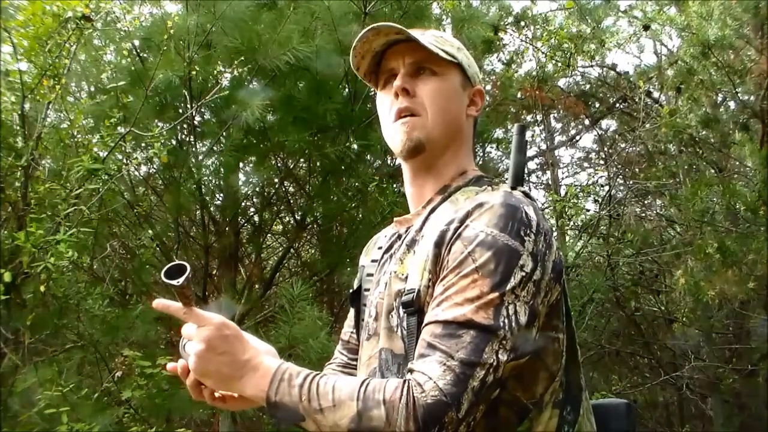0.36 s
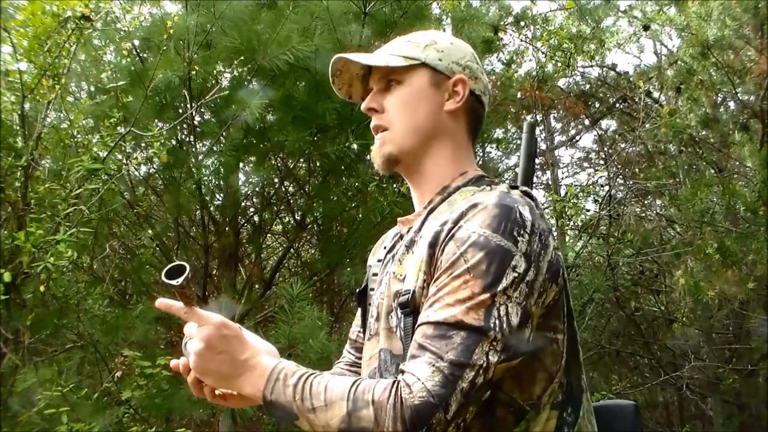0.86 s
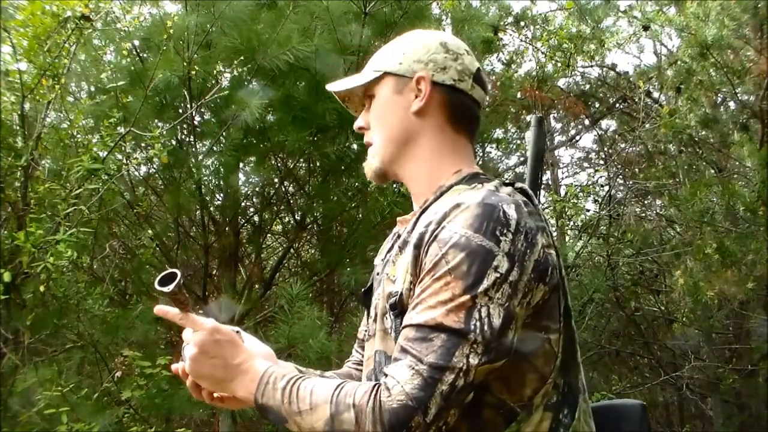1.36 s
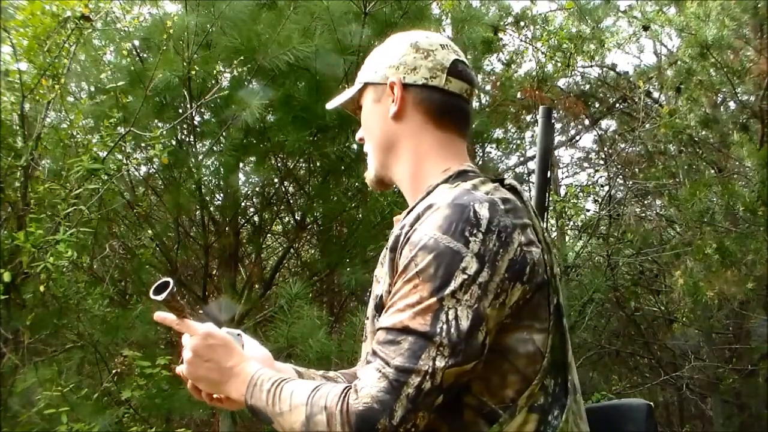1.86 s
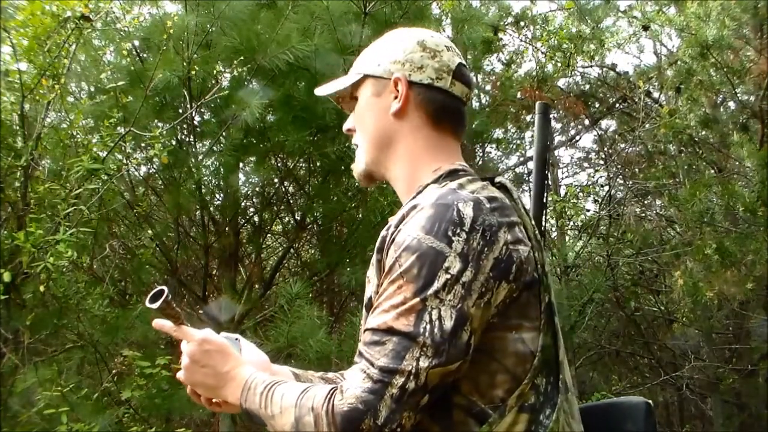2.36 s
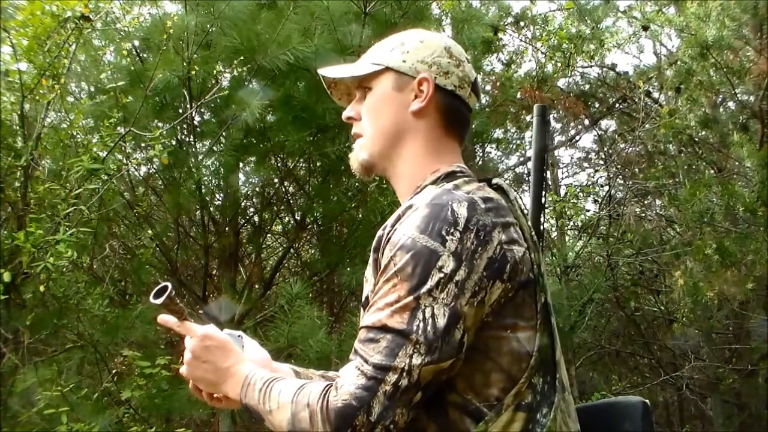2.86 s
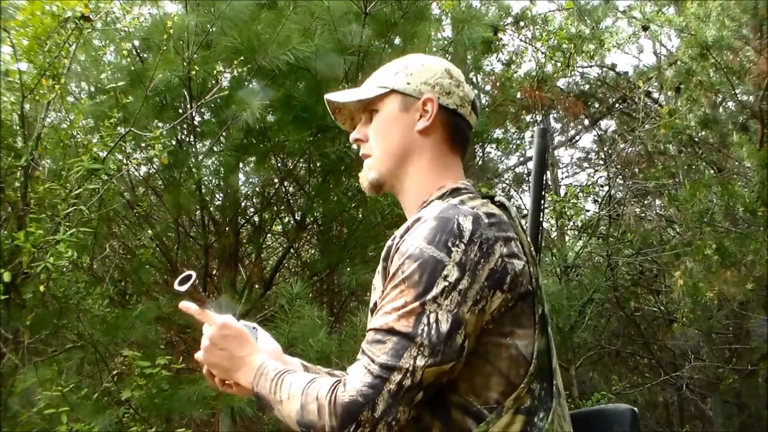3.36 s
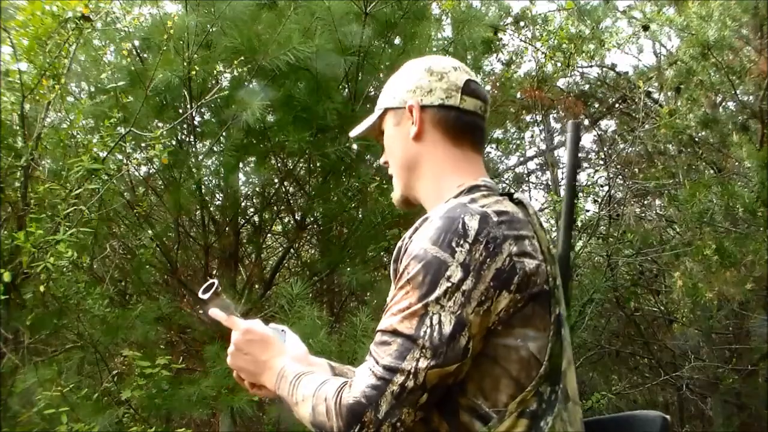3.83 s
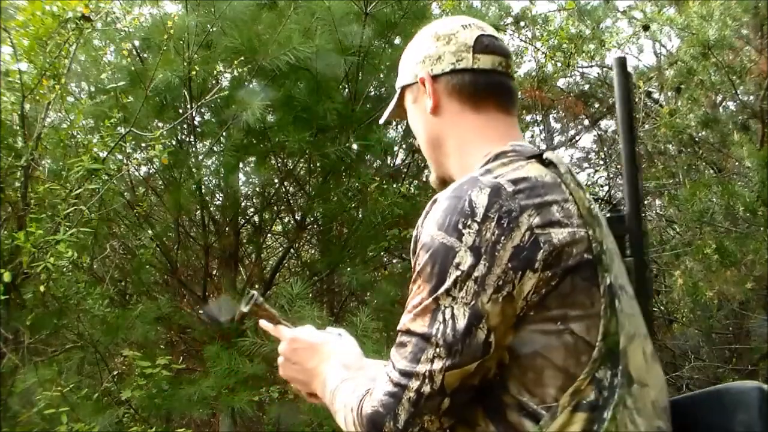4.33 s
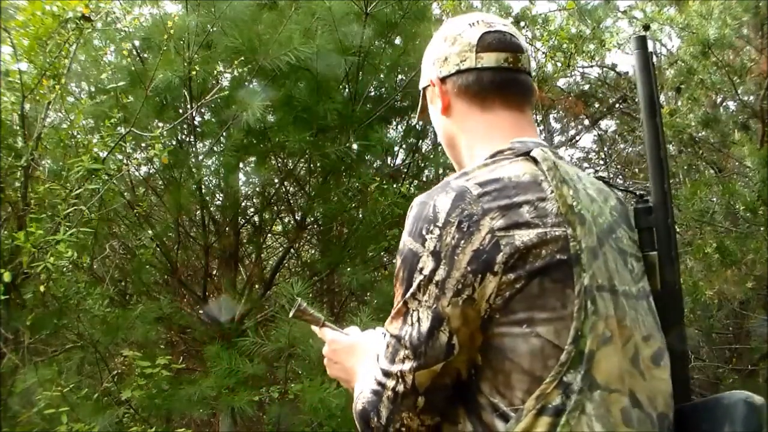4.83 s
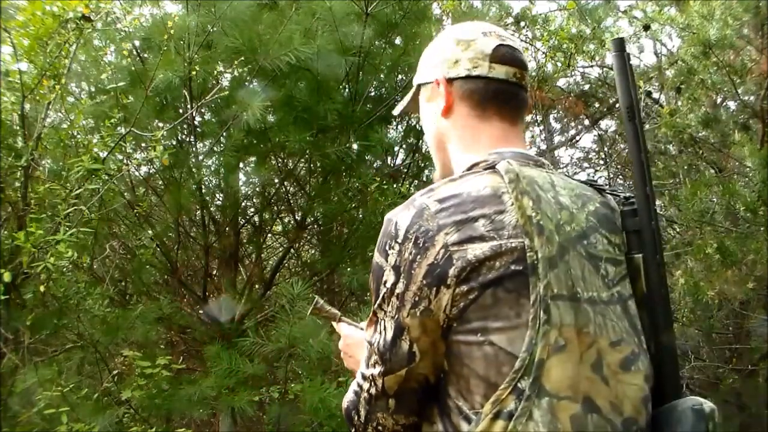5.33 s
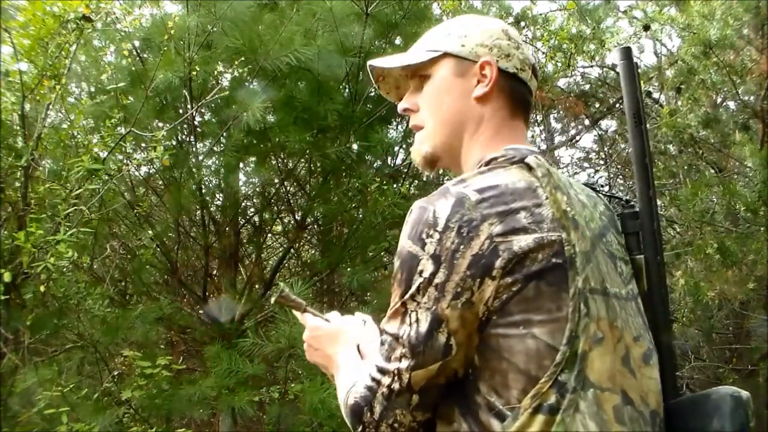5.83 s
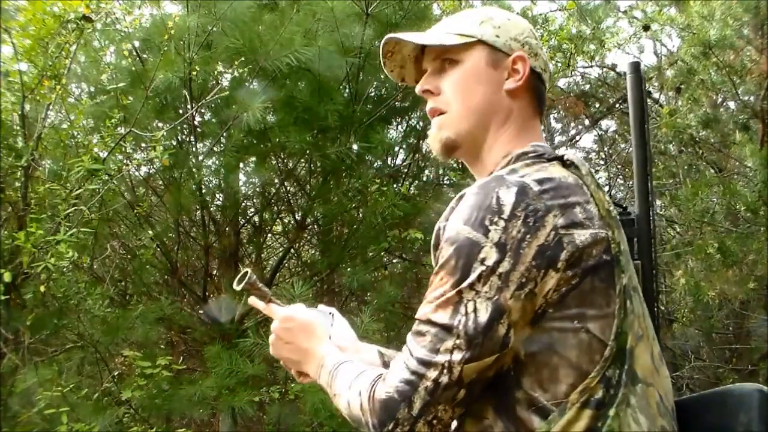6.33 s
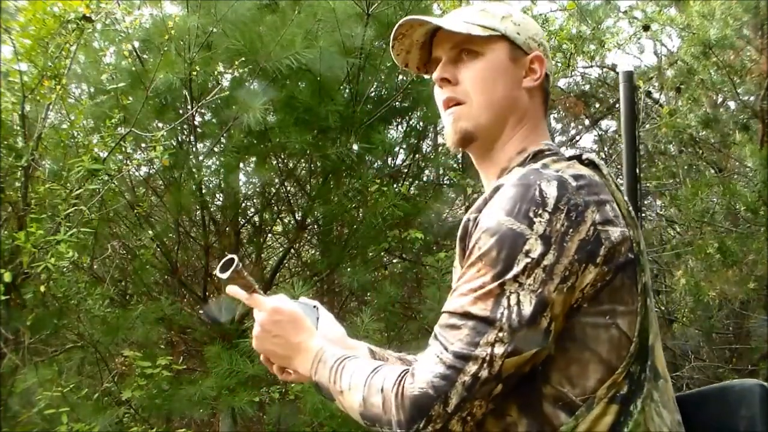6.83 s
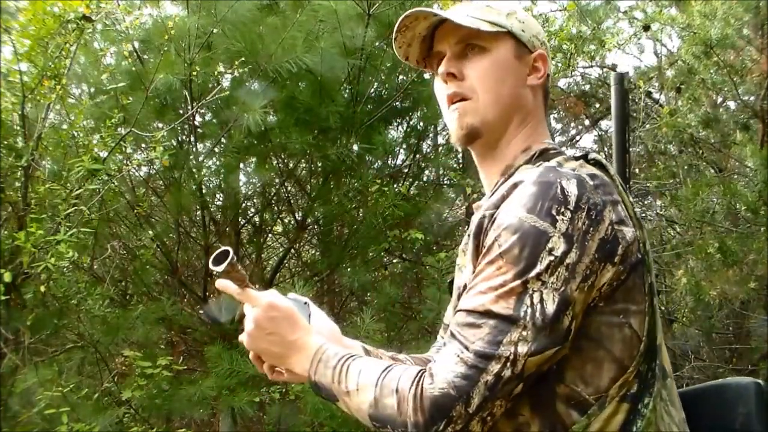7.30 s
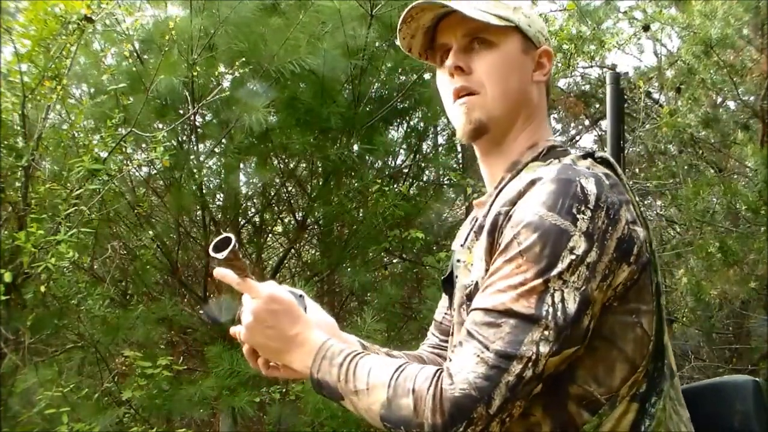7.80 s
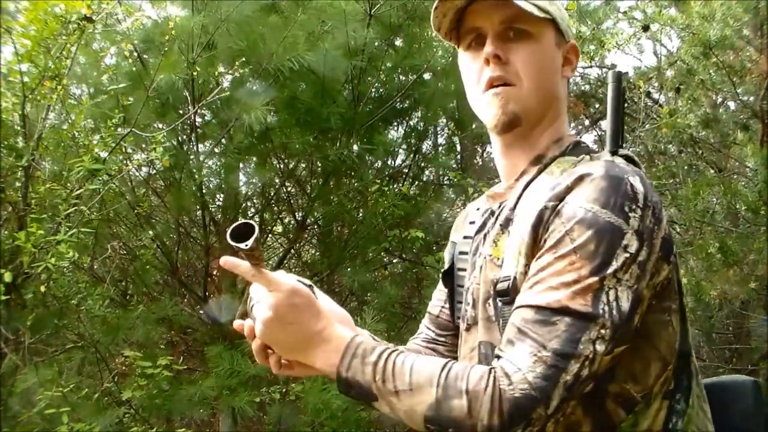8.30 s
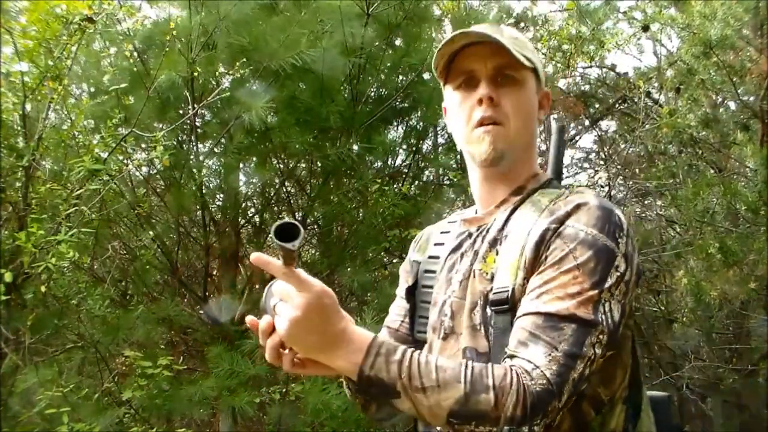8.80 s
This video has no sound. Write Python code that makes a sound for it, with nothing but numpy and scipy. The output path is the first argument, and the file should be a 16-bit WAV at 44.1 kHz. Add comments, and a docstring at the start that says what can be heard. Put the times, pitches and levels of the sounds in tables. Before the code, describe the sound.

A hand-worked turkey call gives sharp woody clucks, then a steady series of nasal, rasping yelps echoing lightly off trees over low traffic rumble.

```python
"""Short clucks open a hand-worked turkey call in woodland; ten longer, increasingly hoarse yelps follow.
A rubbing edge slips about 570-880 times a second and drives a small horn; a scattered echo returns from the trees.
The player's clothes rustle as noise and snap as short bursts; filtered noise makes far traffic and hiss.
A gain control lowers the level after loud sounds and a limiter caps the peaks."""
import sys
import numpy as np
from scipy import signal
from scipy.fft import rfft, irfft, next_fast_len
from scipy.io import wavfile
from scipy.ndimage import uniform_filter1d, minimum_filter1d, map_coordinates

SR = 44100
rng = np.random.default_rng(int(sys.argv[2]) if len(sys.argv) > 2 else 0)


def invert_db(x):
    """Field ratio 10**(x/20) for x, a level in decibels (scalar or array-like)."""
    u = np.asarray(x, float) / 20
    return 10 ** u


def store_pcm(level_fs):
    """Save levels as 16-bit WAV."""
    pcm = np.round(np.clip(level_fs, -1, 1) * 32767).astype(np.int16)
    wavfile.write(sys.argv[1], SR, np.atleast_2d(pcm).T)


N = 404397
T = np.arange(N) / SR

# short pulls: start_s, length_s, slowest_slip_hz, level_db, end_level_db, tilt_db_per_octave
CLUCK_PULLS = [(-.008, 0.018, 730, -19.5, -23.5, -3.5), (.091, 0.014, 657, -21, -18, -5),
               (.249, 0.019, 665, -18, -23, -4), (0.986, .016, 812, -20, -19.5, -7),
               (1.187, 0.018, 653, -21, -18, -2.5), (1.381, .018, 670, -20.5, -17.5, 0),
               (2.016, 0.014, 670, -20.5, -19.5, 1), (2.272, 0.015, 705, -22, -19, 2),
               (2.335, .012, 707, -21, -22, 2.5), (2.809, 0.021, 636, -16, -26, 0.5),
               (2.919, .023, 670, -18.5, -27, 1), (3.483, 0.02, 616, -16, -22, 2),
               (3.913, .016, 654, -15, -24.5, 2.5), (4.428, 0.018, 630, -21, -25.5, -2),
               (4.465, 0.016, 720, -23.5, -24.5, -3), (4.649, 0.035, 670, -19.5, -29.5, -3.5)]
# long pulls: start_s, lead_in_s, length_s, slowest_at_share, slowest_slip_hz, end_slip_hz,
# early_db, midway_db, end_db, midway_tilt_db_per_octave, hoarseness, third_harmonic_db
YELP_PULLS = [(5.113, 0.048, 0.056, 0.44, 622, 692, -33, -26, -31, -1, .3, -3.5),
              (5.505, 0.037, 0.082, 0.46, 590.6, 683, -23.5, -20.5, -27.5, -0.5, .1, -5),
              (5.887, .018, 0.091, 0.59, 586, 640.5, -23.5, -24, -20, 1.5, .3, -5.5),
              (6.287, 0.015, 0.093, 0.17, 589.3, 668, -19.5, -19.5, -26.5, 1, 0.093, 1),
              (6.668, 0.02, .1, 0.37, 566, 630, -28.5, -18, -34, 1, 0.34, 2),
              (7.058, .018, .096, 0.44, 570.5, 638, -19.5, -18, -27, 1.5, 0.66, 0.5),
              (7.452, .017, .088, 0.27, 588.7, 629, -25, -21, -24, -1, 0.68, 0.5),
              (7.832, 0.031, 0.1, 0.48, 621, 630, -18, -16, -23.5, -1.5, 0.91, 0.5),
              (8.206, 0.038, 0.077, 0.092, 617.3, 670, -18, -18, -23.5, -0.5, 0.66, 3),
              (8.578, .016, 0.033, 0.72, 646.6, 680, -16.5, -21, -15, -4, 0.81, 3)]
# light whistling touches: peak_s, rise_s, slip_hz, level_db
PIP_TOUCHES = [(.822, 0.02, 876, -22.5), (0.888, 0.0055, 874, -31.5), (0.913, 0.011, 860, -30),
               (.975, 0.01, 838, -33.5)]
# horn resonances: center_hz, width_hz, gain_db
HORN_MODES = [(835, 260, -21), (1251, 185, 7), (1719, 173.7, 6), (2311, 65, -5.5), (2697, 160, -9.5),
              (3384, 177, -16), (4070, 380, -24.5), (6040, 910, -34.5)]
# decay of the echo from the trunks: frequency_hz, t60_s
TREE_DECAY = [(600, 1), (1500, 0.61), (2500, 0.39), (6000, 0.053)]
# share of the call sent back as the horn points about: time_s, echo_db
ECHO_SHARE = [(0, -29), (2, -26.5), (4, -26), (5, -22.5), (6, -21.5), (6.5, -29.5), (7.5, -31),
              (7.9, -23.5), (8.25, -28.5), (8.6, -26)]
# cloth sliding on cloth: turn_s, level_db, rise_db_per_s, fall_db_per_s (negative: keeps rising)
CLOTH_SWISHES = [(3.62, -49, 149, 34), (3.895, -45, 134, 300), (4.145, -54, 200, 72), (4.3, -77.5, 40, 41),
                 (4.62, -46.5, 40, 100), (4.915, -51, 79, 156), (5.118, -56, 216, 46), (8.42, -60, 16, -11),
                 (8.605, -40.5, 191, 400), (8.86, -62, 15, 63)]
# cloth noise spectrum: frequency_hz, relative_db
CLOTH_SPECTRUM = [(1200, -22), (2000, -4), (3200, -3), (4100, 0), (6400, -5), (10000, -2), (14500, -7)]
# single snapping creases: start_s, peak_db, center_hz
CREASE_SNAPS = [(1.7403, -40, 4270), (4.0522, -28, 3850), (4.117, -27, 3900), (4.154, -25.5, 3620),
                (4.161, -28, 4560), (4.2407, -29.5, 4670), (4.2697, -32, 10200), (4.4046, -32, 4070),
                (4.5037, -24, 8000), (4.9097, -31, 9510), (5.094, -40, 7100), (5.1183, -30.5, 9500),
                (8.033, -38, 11200), (8.0867, -39.5, 8020), (8.6043, -18.5, 12000), (8.6213, -19.5, 8500),
                (8.6334, -28, 4190), (8.8804, -29, 7300), (8.9486, -38, 10500), (9.0368, -44, 10200),
                (9.0765, -33, 7270)]
# flurries of small creases: from_s, to_s, snaps_per_s, softest_peak_db
CREASE_FLURRIES = [(3.947, 4.453, 170, -45.5), (4.804, 5.001, 45, -47), (8.652, 9.163, 150, -61)]
# traffic level, partly gain dips after calls: time_s, relative_db
TRAFFIC_LEVEL = [(0, -54), (1.2, -59), (1.81, -53), (2.4, -58), (2.68, -52), (3.17, -57), (3.75, -49),
                 (4.14, -56), (5.41, -51.5), (6.15, -53.5), (6.65, -62), (6.95, -51.5), (7.35, -61.5),
                 (7.99, -49.5), (8.33, -54), (9.17, -49)]
# traffic spectrum: frequency_hz, relative_db_per_hz
TRAFFIC_SPECTRUM = [(14, -34), (22, 0.5), (30, 3.5), (42, -9.5), (90, 2), (124, -6), (166, -6.5),
                    (305, -12.5), (520, -11.5), (988, -17), (1410, -20), (1780, -25), (3000, -39),
                    (6600, -120)]
# hiss spectrum: frequency_hz, relative_db
HISS_SPECTRUM = [(1500, -20), (2500, -1), (4000, 0), (8000, -3), (14500, -5.5)]

# any pull: level and tilt at its outer ends
QUIET_DB, THIN_DB_PER_OCTAVE = -55, -11
SNAP_OFF_S = 0.0028
SHIMMER_KNOTS_PER_S = 100
TREBLE_DB_PER_OCTAVE = 4.5  # added above the seventh harmonic
CLUCK_RASP_DB = -21.5  # pips too

# cluck: grips, drops to its slowest, speeds up as the pull lets go
GRIP_S, DROP_S, LET_GO_S, HOLD_SHARE = .005, 0.0045, .01, .4
FREE_HZ, DROP_SHARE, CLIMB_SHARE = 850, 0.379, 0.426
OPENS_DB, DIP_DB, SNAP_OFF_DB = -2, -2.5, -16.5
LONG_S = .0205  # longer clucks start at their slowest

PIP_CLIMB_HZ_PER_S, PIP_FALL_S, PIP_TILT_DB_PER_OCTAVE = 900, 0.01, -18

# yelp: whines high and thin, breaks down, sags, climbs again
WHINE_HZ, BREAK_HZ = 783.6, 654
BREAK_S, SETTLE_S, STOP_S = 0.00717, .008, 0.014
WHINE_DB, BREAK_DB, YELP_OFF_DB = -37.5, -1.5, -7.5
SAG_BEND, CLIMB_BEND = 2.22, 1.8
DULL_ENDS_DB_PER_OCTAVE = 2.5  # brightest midway
DOUBLING, CLEAR_DB, HOARSE_DB = 0.2, -28.5, 26


def unit(x):
    """Scale to rms 1."""
    return x / np.sqrt(np.mean(x ** 2) + 1e-20)


def along(points, hz):
    """Interpolate (frequency_hz, value) points on a log axis."""
    f, v = np.transpose(points)
    return np.interp(np.log(hz + 1), np.log(f + 1), v)


def wobble(knots_per_s, size=N):
    """Smooth random curve."""
    knots = rng.standard_normal(int(size * knots_per_s / SR) + 4)
    return map_coordinates(knots, [np.arange(size) * knots_per_s / SR])


def filtered(x, response):
    """Multiply the spectrum of x by a response of frequency."""
    m = next_fast_len(N + 8192)
    return irfft(rfft(x, m) * response(np.fft.rfftfreq(m, 1 / SR)), m)[..., :N]


def stereo_noise(spectrum, side_db, patchy_db):
    """Shaped stereo noise of rms 1 with random gain patches over time and frequency."""
    z = signal.stft(rng.standard_normal((2, N + 512)), nperseg=512)[2]
    field = uniform_filter1d(rng.standard_normal(z.shape[1:]), size=6, axis=0)
    field = uniform_filter1d(field, size=12, axis=1)
    pair = signal.istft(z * invert_db(patchy_db * unit(field)), nperseg=512)[1][:, :N]
    f, db = np.transpose(spectrum)

    def shape(hz):
        return invert_db(np.interp(np.log(hz + 1), np.log(f + 1), db, left=-120, right=-120))

    mid, side = filtered(pair, shape)
    return unit(np.array([mid + invert_db(side_db) * side, mid - invert_db(side_db) * side]))


def call():
    """Slip trains of all clucks, pips and yelps ring through the horn."""
    short_pulls = [cluck(*row) for row in CLUCK_PULLS] + [pip(*row) for row in PIP_TOUCHES]
    strokes = [stroke(p, jitter=0.012, shimmer_db=1.16, sizzle_db=11.0) for p in short_pulls]
    for *row, third_db in YELP_PULLS:
        strokes.append(stroke(yelp(*row), jitter=0.006, shimmer_db=1.5, sizzle_db=6.5, third_db=third_db))
    edge = np.zeros(N)
    for at, slips in strokes:
        edge[at:at + len(slips)] += slips
    return filtered(edge, horn)


def cluck(start_s, length_s, low_hz, db, end_db, tilt):
    """Cluck control points: time_s, slip_hz, level_db, tilt_db_per_octave, doubling, rasp_db."""
    rise_hz = FREE_HZ - low_hz
    first_hz = low_hz + DROP_SHARE * rise_hz * (length_s < LONG_S)
    climb_s = DROP_S + HOLD_SHARE * max(length_s - LONG_S, 0) + 1 / SR
    points = [(-GRIP_S, first_hz, QUIET_DB, THIN_DB_PER_OCTAVE),
              (0, first_hz, db + OPENS_DB, tilt),
              (DROP_S, low_hz, db, tilt),
              (climb_s, low_hz, db, tilt),
              ((climb_s + length_s) / 2, low_hz + CLIMB_SHARE * rise_hz, (db + end_db) / 2 + DIP_DB, tilt),
              (length_s, FREE_HZ, end_db, tilt),
              (length_s + SNAP_OFF_S, FREE_HZ + 15, end_db + SNAP_OFF_DB, THIN_DB_PER_OCTAVE),
              (length_s + LET_GO_S, FREE_HZ + 15, QUIET_DB, THIN_DB_PER_OCTAVE)]
    return [(start_s + t, *rest, 0, CLUCK_RASP_DB) for t, *rest in points]


def pip(peak_s, rise_s, hz, db):
    """Control points of a light touch: a soft, slightly climbing whistle; columns as in cluck()."""
    shape = [(-rise_s, QUIET_DB), (-rise_s / 2, db - 6.5), (0, db),
             (PIP_FALL_S / 2, db - 9), (PIP_FALL_S, QUIET_DB)]
    return [(peak_s + t, hz + PIP_CLIMB_HZ_PER_S * t, level, PIP_TILT_DB_PER_OCTAVE, 0, CLUCK_RASP_DB)
            for t, level in shape]


def yelp(start_s, lead_s, length_s, slowest, low_hz, end_hz, early_db, mid_db, end_db, tilt, hoarse):
    """Yelp control points: rate sags and climbs, hoarseness grows along the pull; columns as in cluck()."""
    done = np.arange(13) / 12
    sag_hz = max(BREAK_HZ - low_hz, 0) * np.maximum(1 - done / slowest, 0) ** SAG_BEND
    climb_hz = (end_hz - low_hz) * (np.maximum(done - slowest, 0) / (1 - slowest)) ** CLIMB_BEND
    # level arches through early, midway and end values
    arch_db = early_db + (end_db - early_db) * done
    arch_db += (mid_db - (early_db + end_db) / 2) * np.sin(np.pi * done)
    arch_db += BREAK_DB * np.maximum(1 - done * length_s / SETTLE_S, 0)
    tilts = tilt - DULL_ENDS_DB_PER_OCTAVE * (2 * done - 1) ** 2
    points = [(-lead_s, WHINE_HZ, QUIET_DB, THIN_DB_PER_OCTAVE),
              (-BREAK_S, WHINE_HZ - 35, WHINE_DB, THIN_DB_PER_OCTAVE)]
    points += list(zip(done * length_s, low_hz + sag_hz + climb_hz, arch_db, tilts))
    points += [(length_s + SNAP_OFF_S, end_hz, end_db + YELP_OFF_DB, tilt - DULL_ENDS_DB_PER_OCTAVE),
               (length_s + STOP_S, end_hz, QUIET_DB, THIN_DB_PER_OCTAVE)]

    def wear(t):
        return hoarse * (0.24 + np.clip(t / length_s, 0, 1))

    return [(start_s + t, *rest, DOUBLING * wear(t), CLEAR_DB + HOARSE_DB * wear(t)) for t, *rest in points]


def stroke(points, jitter, shimmer_db, sizzle_db, third_db=0):
    """One pull: a slip train with fluttering harmonics plus scraping noise, levelled for the horn's output."""
    s, *controls = np.transpose(points)
    first = max(round(s[0] * SR), 0)
    t = np.arange(first, round(s[-1] * SR)) / SR
    slip_hz, db, tilt, doubling, rasp_db = [np.interp(t, s, c) for c in controls]
    turns = np.cumsum(slip_hz * (1 + jitter * wobble(393.3, size=len(t)))) / SR + rng.random()
    k = np.arange(1, 41)[:, None] / 2  # multiples of the slip rate, half steps included
    weight = invert_db(tilt * np.log2(np.maximum(k, 2) / 2))
    weight *= invert_db(TREBLE_DB_PER_OCTAVE * np.log2(np.maximum(k, 7) / 7))
    weight[::2] *= doubling  # half-step multiples
    weight[k[:, 0] == 3] *= invert_db(third_db)
    horn_rms = np.sqrt((abs(weight * horn(k * slip_hz)) ** 2).sum(0) / 2)
    # high harmonics flutter more
    flutter = np.array([wobble(SHIMMER_KNOTS_PER_S, size=len(t)) for _ in k])
    weight *= invert_db(shimmer_db * np.sqrt(np.maximum(k - 1.6, .1)) * flutter)
    tone = (weight * np.cos(2 * np.pi * k * turns)).sum(0) / horn_rms
    # grit pulses once a slip
    grit = (1 + np.cos(2 * np.pi * turns)) * rng.standard_normal((2, len(t)))
    rasp = invert_db(rasp_db + tilt) * grit[0]
    sizzle = invert_db(sizzle_db + tilt) * np.diff(grit[1], prepend=0)
    fade = np.clip(np.minimum(t - s[0], s[-1] - t) / 0.00067, 0, 1)
    return first, invert_db(db) * fade * (tone + rasp + sizzle)


def horn(hz):
    """Horn response: resonances in alternating sign; only a weak mode radiates fully in the bass."""
    modes = []
    for k, (center_hz, width_hz, db) in enumerate(HORN_MODES):
        damping = 1j * hz * width_hz
        modes.append((-1) ** k * invert_db(db) * damping / (center_hz ** 2 - hz * hz + damping))
    low, *high = modes
    # the top mode's flipped sign hollows out the range below it
    upper = sum(high[:-1]) - high[-1]
    return low + upper / (1 + (1080 / (hz + 1)) ** 9) / (1 + (hz / 13000) ** 3)


def trees(x):
    """Scattered echo: decaying noise tails, drawn anew each third of a second."""
    out, step, delay = np.zeros((2, N + 2 * SR)), SR // 3, 300  # samples
    for at in range(0, N, step):
        hz, t, z = signal.stft(rng.standard_normal((2, SR)), SR, nperseg=256)
        decay = invert_db(-60 * t / along(TREE_DECAY, hz)[:, None])
        mid, side = signal.istft(z * decay, SR, nperseg=256)[1]
        tail = np.array([mid + 0.3 * side, mid - 0.28 * side]) / np.linalg.norm(mid)
        wet = signal.fftconvolve(x[None, at:at + step], tail, axes=1)
        out[:, at + delay:at + delay + wet.shape[1]] += wet
    return out[:, :N]


def clothes():
    """Sliding cloth is fine-grained noise; creases snap as noise bursts, singly and in flurries."""
    power = 0
    for s, db, rise, fall in CLOTH_SWISHES:
        power = power + invert_db(db - np.maximum(rise * (s - T), fall * (T - s))) ** 2
    grain = invert_db(2.36 * wobble(250)) * stereo_noise(CLOTH_SPECTRUM, side_db=-6.5, patchy_db=.6)
    cloth = np.sqrt(power) * unit(grain)
    snaps = list(CREASE_SNAPS)
    for from_s, to_s, per_s, db in CREASE_FLURRIES:
        draws = rng.random((int((to_s - from_s) * per_s), 3))
        snaps += [(from_s + u * (to_s - from_s), db + 11 * v ** 2, 3200 * 5.8 ** w) for u, v, w in draws]
    t = np.arange(300) / SR
    for s, db, hz in snaps:
        burst = rng.standard_normal((2, 300)) * invert_db(-60 * t / 0.0055)
        band = signal.butter(2, [hz * 0.53, min(hz * 1.7, 16000)], "band", fs=SR)
        narrow = signal.lfilter(*band, burst)
        mid, side = narrow + 0.39 * np.diff(burst, prepend=0) + 0.18 * burst
        at = min(round(s * SR), N - 300)
        pair = np.array([mid + 0.41 * side, mid - 0.45 * side])
        cloth[:, at:at + 300] += invert_db(db) / abs(mid).max() * pair
    return cloth * invert_db([[-.7], [.7]])


def background():
    """Far traffic and a fuzzy drone as band noise, stronger on the left in the bass, over a smooth hiss."""
    level = invert_db(np.interp(T, *np.transpose(TRAFFIC_LEVEL)) + 5.0)
    traffic = level * stereo_noise(TRAFFIC_SPECTRUM, side_db=-14, patchy_db=2.0)
    hum_spectrum = [(88, -30), (96, -6), (101, 0), (106, -8), (114, -30)]  # frequency_hz, relative_db
    hum = stereo_noise(hum_spectrum, side_db=-16, patchy_db=0)
    drone = invert_db(-57.5 + .6 * wobble(3.03)) * hum

    def lean(hz):
        return invert_db(np.array([[1], [-1]]) * 1.3 / (1 + hz / 350))

    hiss = invert_db(-65.5) * stereo_noise(HISS_SPECTRUM, side_db=0, patchy_db=0)
    return filtered(traffic + drone, lean) + hiss


def scene():
    """The call close by, its echo, the player's clothes and the background."""
    near = call()
    echo = trees(near * invert_db(np.interp(T, *np.transpose(ECHO_SHARE))))
    return near * invert_db([[.25], [-.25]]) + echo + clothes() + background()


def top_cut(x):
    """Nothing passes above the cut-off."""
    return signal.sosfilt(signal.butter(12, 15030, fs=SR, output="sos"), x)


def record(dry):
    """Gain control follows the averaged power, a limiter holds the peaks, a steep low-pass ends the band."""
    keep = np.exp(-1 / (.35 * SR))  # 0.35 s averaging
    power = signal.lfilter([1 - keep], [1, -keep], np.mean(dry ** 2, axis=0))
    x = dry * invert_db(3.0) * (1 + power / invert_db(-33.5) ** 2) ** -.28
    needed = np.minimum(1, 0.27 / (abs(x).max(axis=0) + 1e-9))
    limited = x * uniform_filter1d(minimum_filter1d(needed, size=400), size=300)
    mix = filtered(limited, lambda hz: 1 / (1 + (hz / 14300) ** 200))
    return top_cut(mix)


dry = scene()
out = record(dry)
store_pcm(out)
```